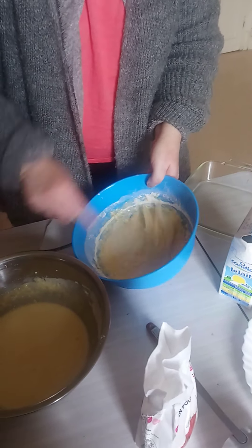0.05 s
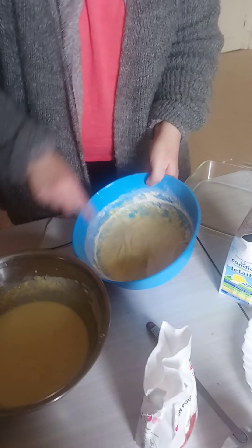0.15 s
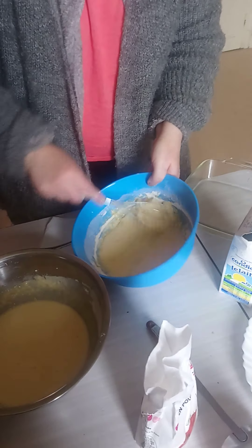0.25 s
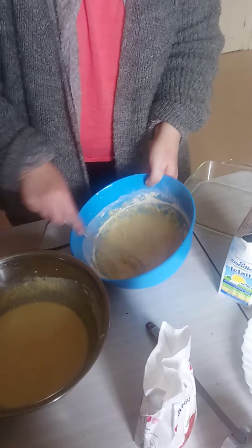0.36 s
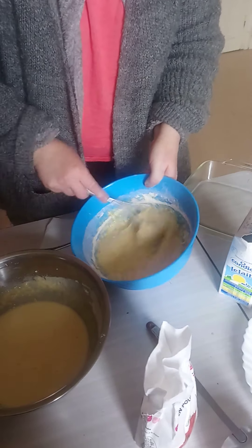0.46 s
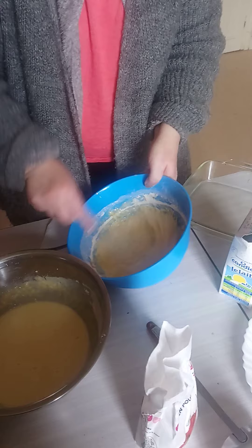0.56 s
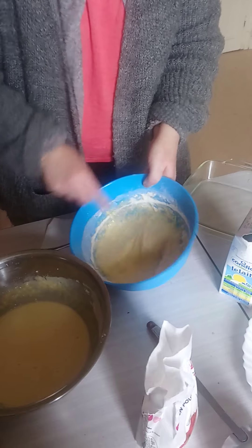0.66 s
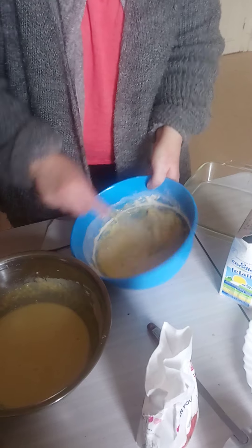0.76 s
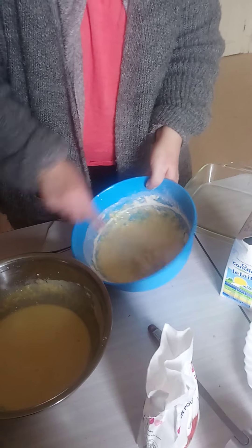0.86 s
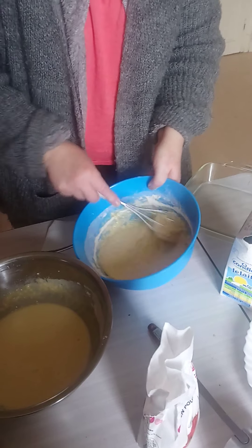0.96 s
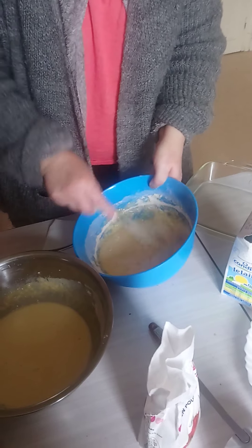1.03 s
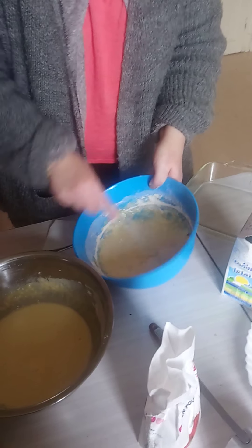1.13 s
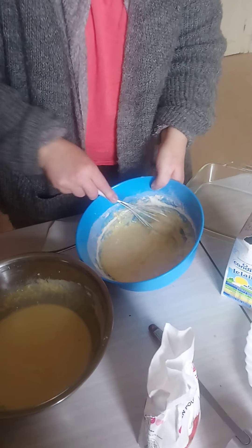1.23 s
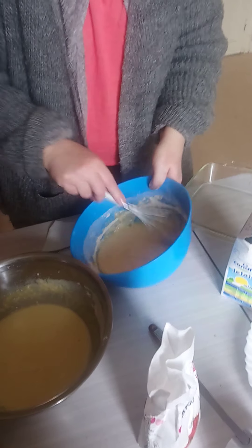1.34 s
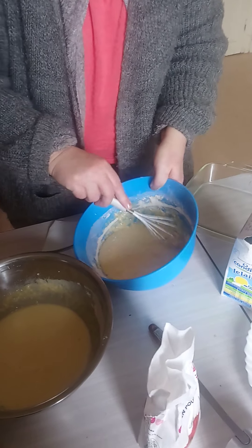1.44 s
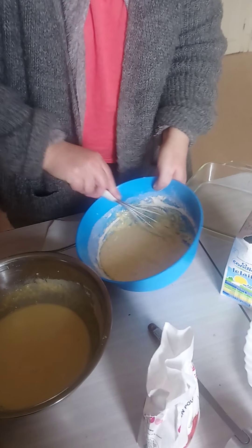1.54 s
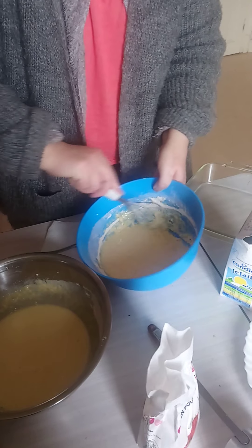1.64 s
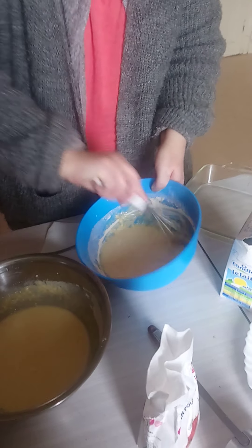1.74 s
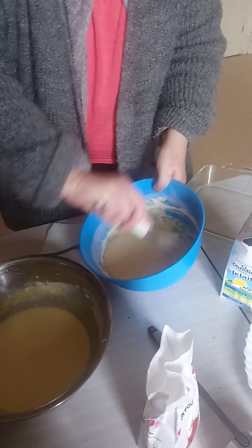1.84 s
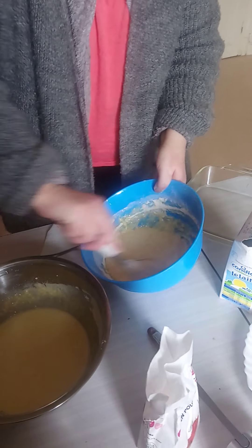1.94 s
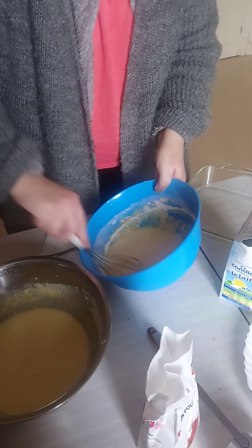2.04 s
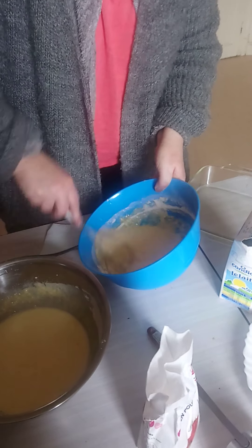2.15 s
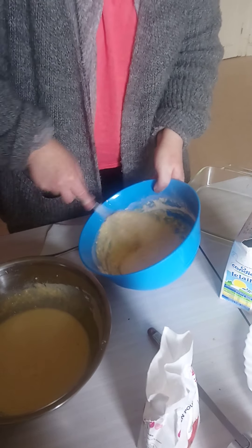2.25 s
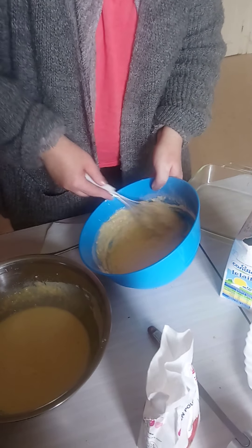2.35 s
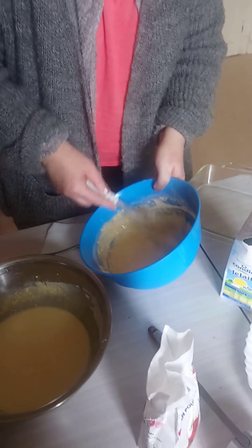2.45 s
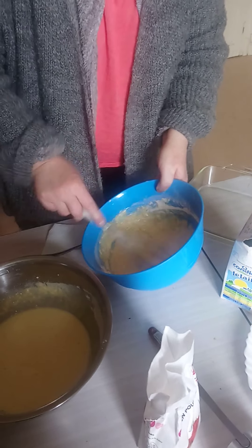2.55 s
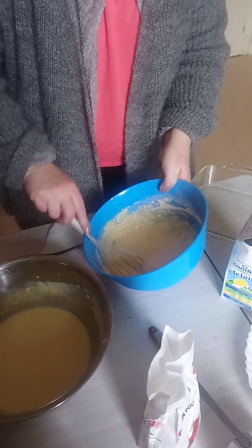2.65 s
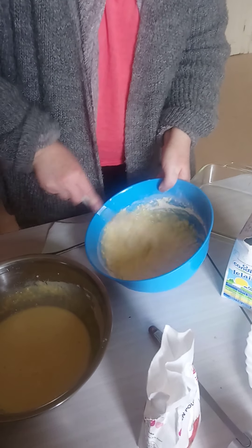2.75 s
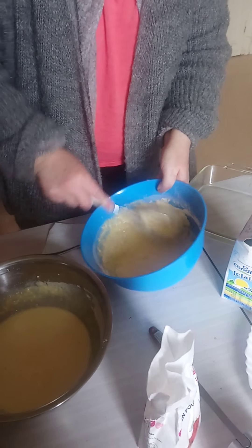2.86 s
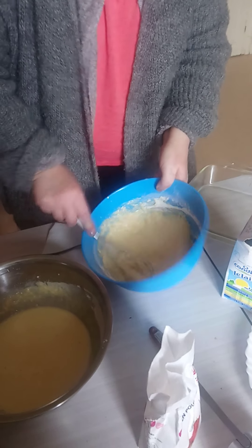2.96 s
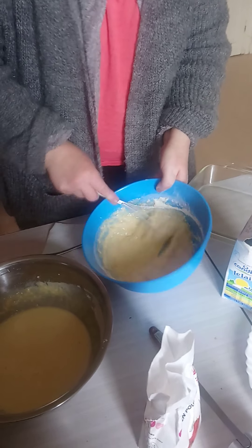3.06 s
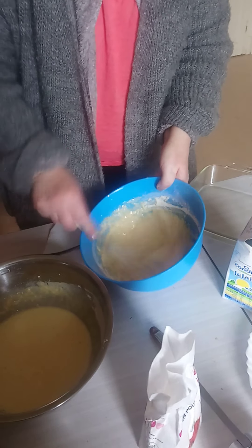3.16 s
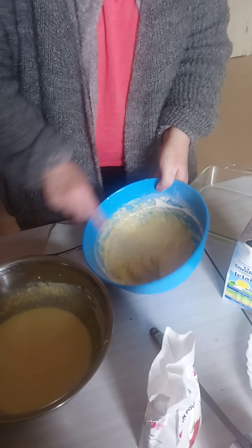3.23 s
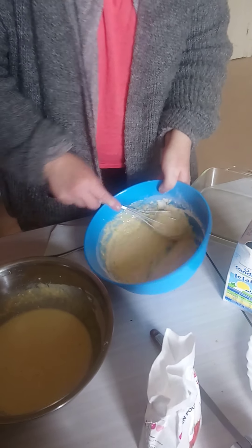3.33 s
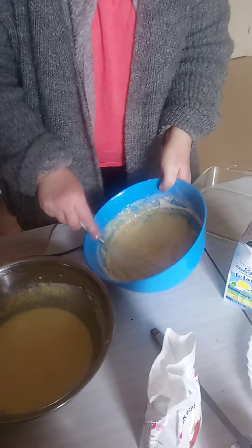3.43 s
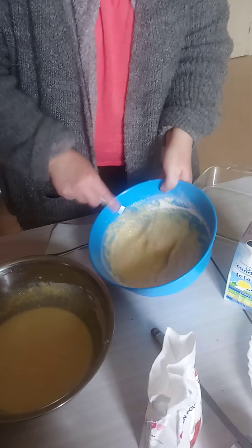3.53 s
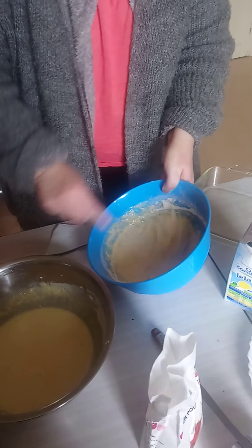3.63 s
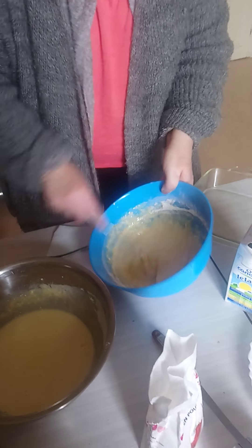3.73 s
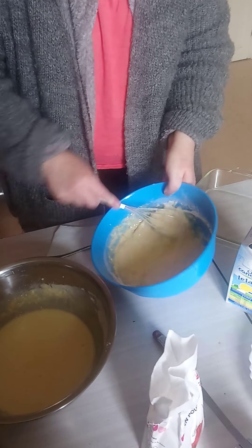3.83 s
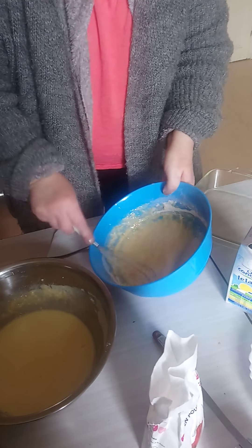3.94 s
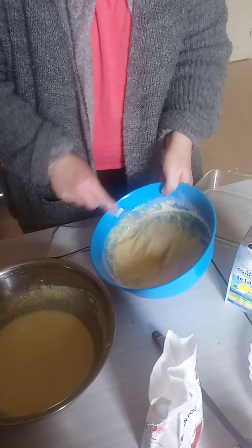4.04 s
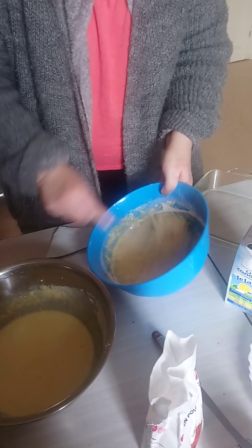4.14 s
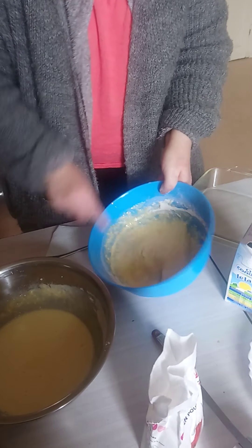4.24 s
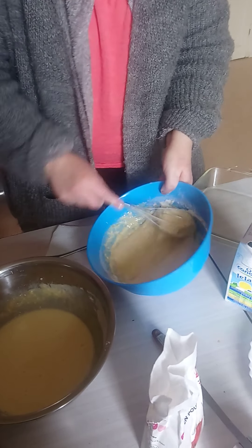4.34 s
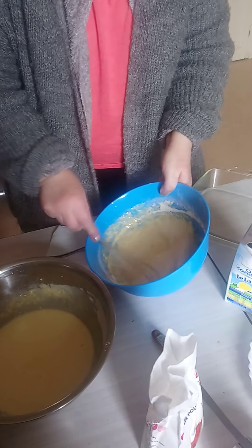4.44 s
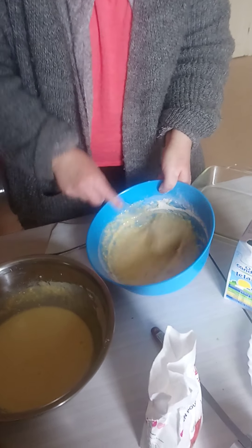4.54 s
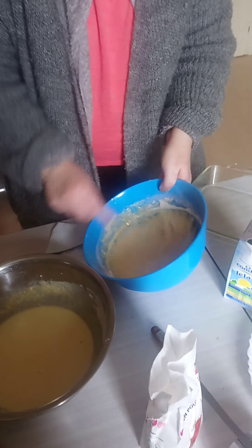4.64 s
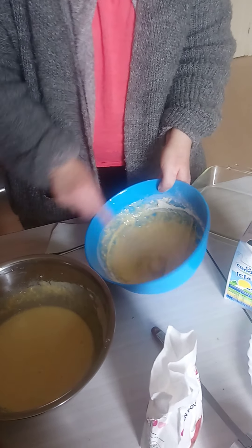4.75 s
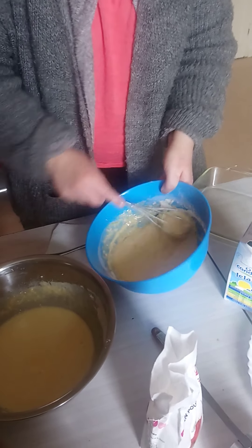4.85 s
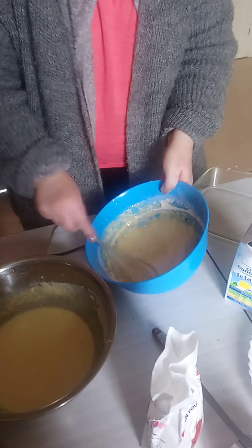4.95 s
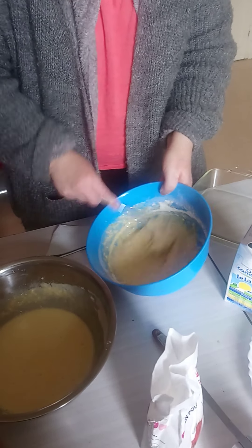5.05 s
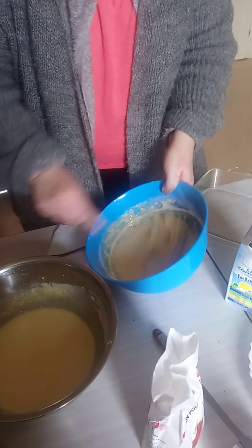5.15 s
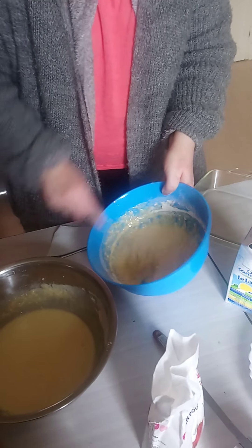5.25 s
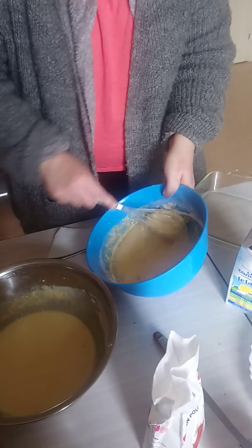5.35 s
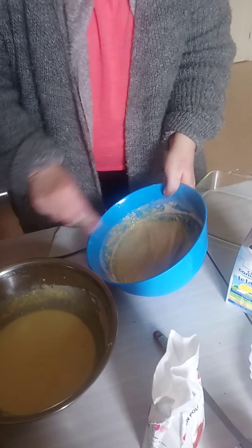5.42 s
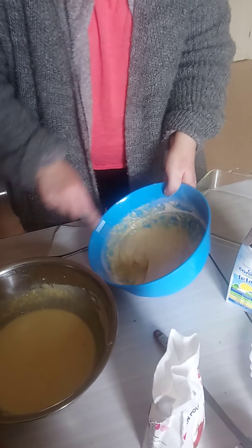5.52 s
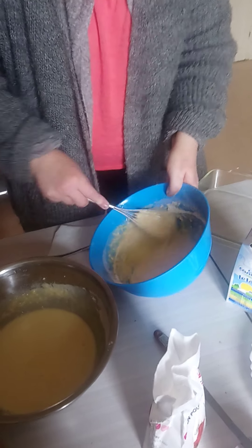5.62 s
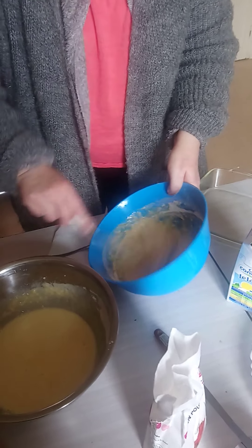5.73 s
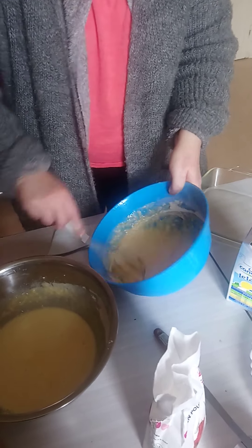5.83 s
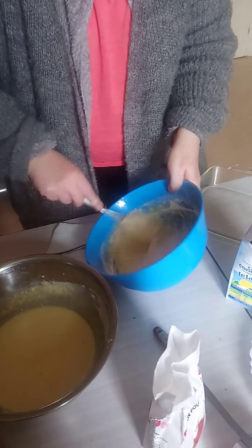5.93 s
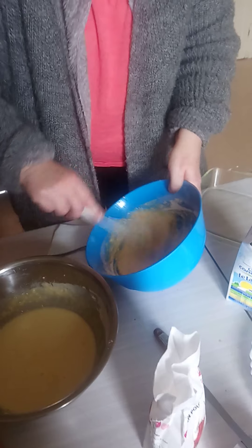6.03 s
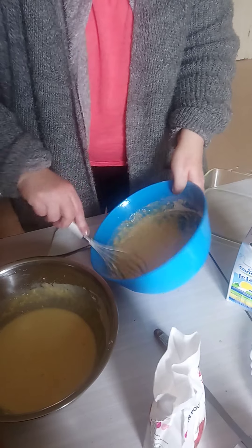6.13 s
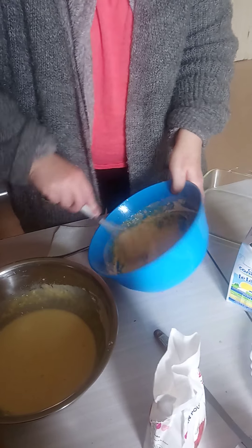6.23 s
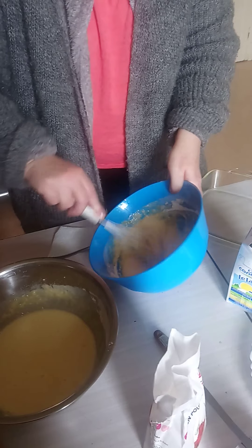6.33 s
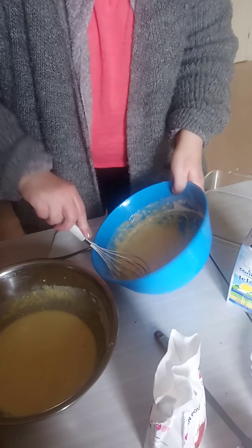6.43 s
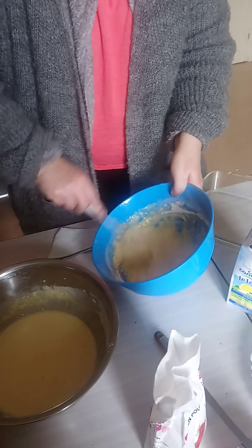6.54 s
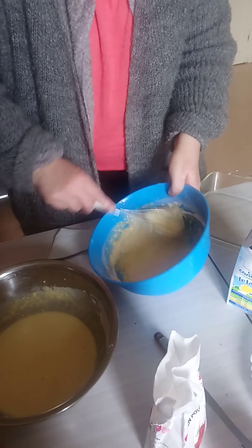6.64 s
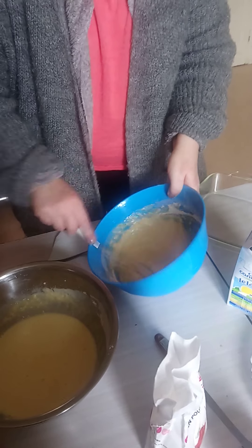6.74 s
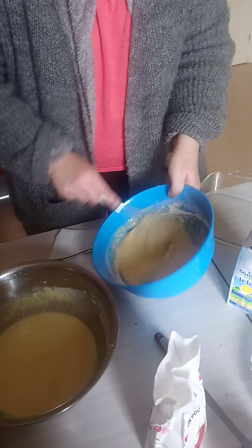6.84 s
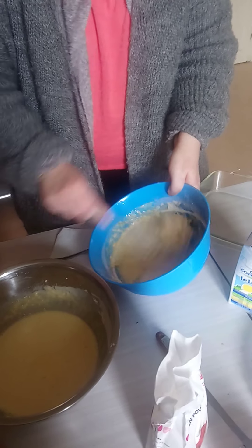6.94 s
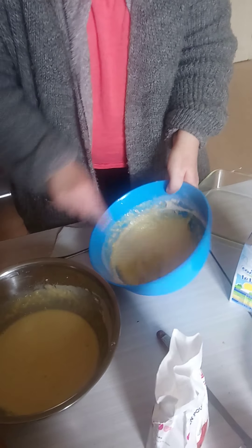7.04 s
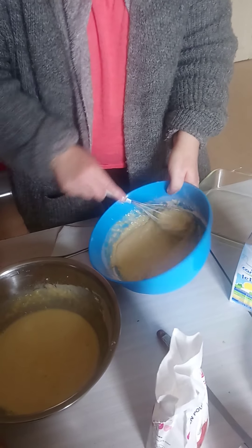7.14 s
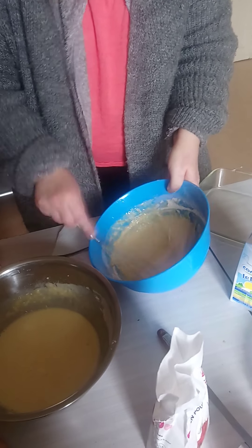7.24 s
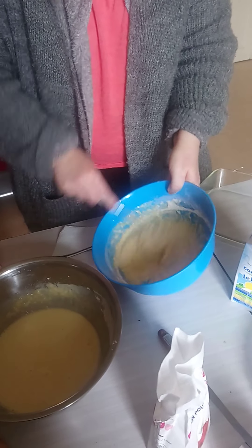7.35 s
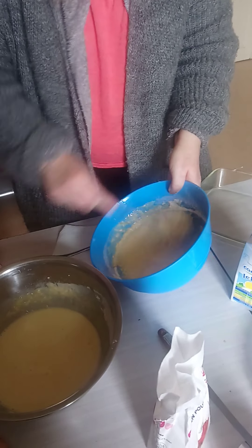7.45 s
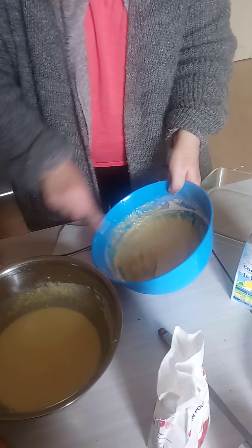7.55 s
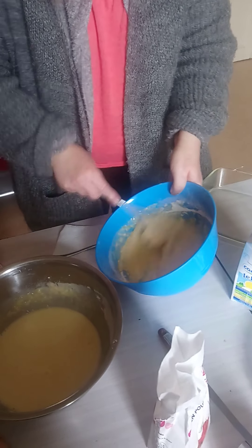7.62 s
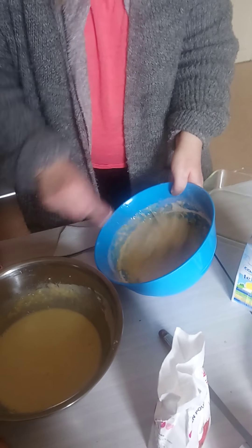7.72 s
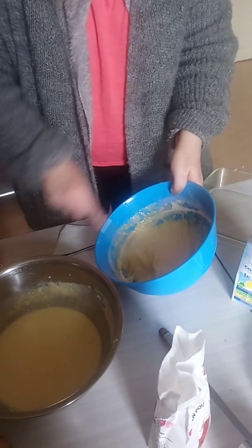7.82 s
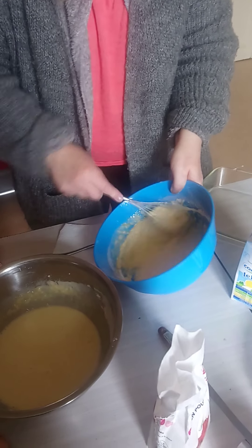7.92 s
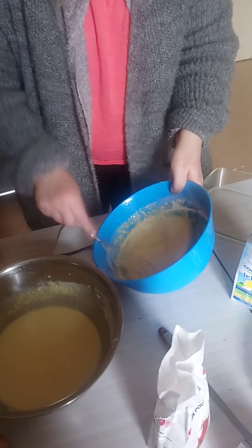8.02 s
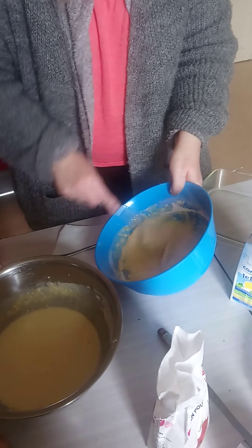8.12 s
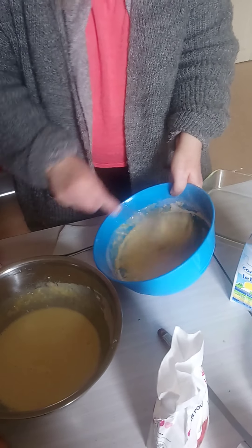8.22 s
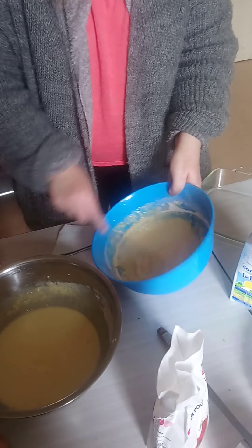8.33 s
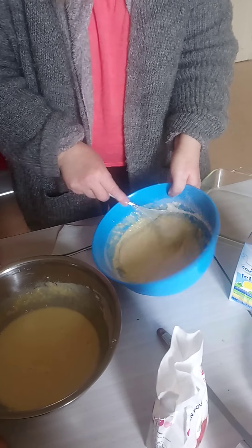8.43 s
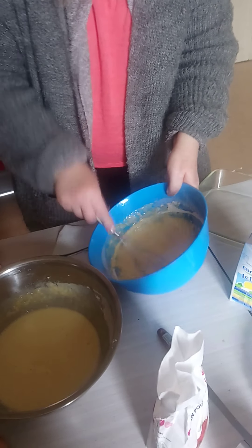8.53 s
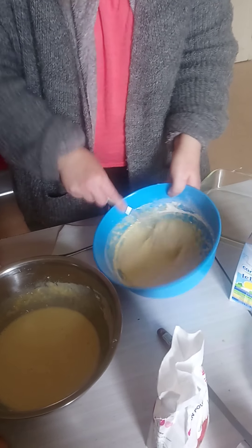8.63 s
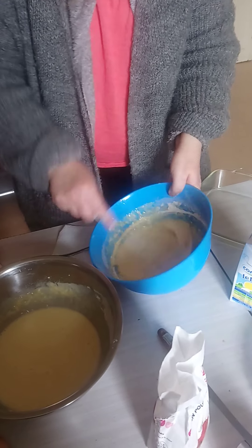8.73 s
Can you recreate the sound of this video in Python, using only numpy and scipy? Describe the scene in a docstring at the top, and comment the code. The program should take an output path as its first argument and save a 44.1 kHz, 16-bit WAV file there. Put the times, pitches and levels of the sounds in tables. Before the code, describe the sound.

A wire whisk beats thick batter in a plastic bowl, first in uneven strokes with a steel ring, then fast and steady.

```python
"""Whisk beating batter

A wire whisk beats batter in a tilted plastic bowl on a kitchen table, heard close up at two ports.
Wires strike the wall and table thumps ring (dying sines), batter slaps (rising tones with dull noise),
the drag hisses (shaped noise); one knock sets a steel bowl ringing, two light touches follow.
Hard kitchen walls carry each blow on for about a third of a second (decaying noise tails)."""
import sys
import numpy as np
from scipy import signal
from scipy.io import wavfile
from scipy.ndimage import uniform_filter1d

SR = 44100
rng = np.random.default_rng(int(sys.argv[2]) if len(sys.argv) > 2 else 0)


def wrap_up_sound(samples):
    """Save the sound to the file named by the first command line argument, as 16-bit audio."""
    columns = np.atleast_2d(samples).T
    # keep every value between -1 and 1, then stretch to whole-number steps
    tamed = np.clip(columns, -1, 1)
    steps = np.round(tamed * 32767).astype(np.int16)
    wavfile.write(sys.argv[1], SR, steps)


N = 387198


def amp(db):
    """Amplitude factor of a level in dB."""
    return 10 ** (np.asarray(db, float) / 20)


def evened(x):
    """Scale to an rms of 1."""
    return x / np.sqrt(np.mean(x ** 2) + 1e-20)


def read(points, hz):
    """Interpolate a (frequency, value) curve over log frequency."""
    f, value = np.transpose(points)
    return np.interp(np.log(hz + 1), np.log(f + 1), value)


def add(mix, start_s, sound):
    """Mix a sound in at start_s, cut at the end of the mix."""
    part = mix[round(start_s * SR):][:len(sound)]
    part += sound[:len(part)]


def ring(modes, seconds, extra_db=0, detune=1, lag_s=0):
    """Struck body: each mode is a sine that dies by 60 dB in its t60."""
    hz, db, t60_s = np.transpose(modes)[:, :, None]
    t = np.arange(round(seconds * SR)) / SR
    extra_db, detune, lag_s = (np.reshape(v, (-1, 1)) for v in (extra_db, detune, lag_s))
    envelope = amp(db + extra_db - 60 * t / t60_s)
    return (envelope * np.sin(2 * np.pi * hz * detune * np.maximum(t - lag_s, 0))).sum(0)


# left-right likeness of scattered sound: (frequency [Hz], correlation [0-1])
LIKENESS = [(60, .99), (180, .96), (550, .5), (1650, .13), (5000, 0)]


def scattered(shape):
    """Stereo noise with the dB field shape(hz, t): bass nearly alike in both ports, treble independent."""
    hz, t = np.fft.rfftfreq(512, 1 / SR)[:, None], np.arange(N // 128 + 5) * 128 / SR
    a, b, c, d = rng.standard_normal((len(t), 257, 4)).T
    same = read(LIKENESS, hz)
    left, other = a + 1j * b, c + 1j * d
    z = np.array([left, same * left + np.sqrt(1 - same ** 2) * other])
    return signal.istft(z * amp(shape(hz, t)), nperseg=512, noverlap=384)[1][:, :N]


# spectrum of the quiet kitchen after the microphones: (frequency [Hz], relative density [dB per Hz])
AIR = [(18, -63), (30, -17), (115, -5), (145, 2), (780, -27), (6210, -15), (12600, -36), (13700, -34),
       (16000, -70)]
AIR_RMS_DB = -64.5  # before the microphones


def quiet_air():
    """Steady room noise; the microphone curve is taken out here as record() puts it back."""
    noise = scattered(lambda hz, t: read(AIR, hz) - read(MIC, hz) + 0 * t)
    return amp(AIR_RMS_DB) * evened(noise)


# spectrum of the drag after the microphones: (frequency [Hz], relative density [dB per Hz])
HISS = [(35, -10), (60, -1.5), (113, -2.5), (651, 6.5), (862, 0.5), (1950, 5.5), (2840, 3), (4530, 6.5),
        (6900, 1), (7940, -16.5), (16000, -20.5)]
# wires sweep along the wall and through batter: (time of fastest motion [s], level [dB])
SWEEPS = [(0.0, -36), (.4, -32), (.65, -33), (.87, -40.5), (3.02, -34), (3.51, -33.5), (3.771, -31.5),
          (4.01, -31.5), (4.26, -37), (4.52, -34), (4.762, -36), (5.01, -35), (5.271, -26.5), (5.56, -38),
          (5.86, -44), (6.49, -35), (7.33, -33.5), (7.59, -47), (7.85, -34), (8.11, -38), (8.37, -31)]
SWELL_DB_PER_S, EBB_DB_PER_S, SWEEP_SLOSH_DB = 276, 182.5, 2
# slow stirring, whisk lifted at 2.4 s and set again: (time [s], level [dB], slosh against hiss [dB])
STIR = [(0.0, -58, 8), (1.25, -48, 9.5), (1.33, -64.5, 19), (1.77, -43.5, 2), (1.97, -44.5, -3),
        (2.2, -51.5, -3), (2.3, -47.5, -4), (2.34, -50.5, -4), (2.42, -64.5, 7.5), (2.58, -62.5, 6),
        (2.62, -47, -7), (2.7, -50, 5), (2.74, -39.5, -2.5), (2.82, -48.5, -1), (2.9, -65, 14),
        (3.0, -57.5, .1), (8.78, -54.5, 11)]
SLOSH_TOP_HZ = 1200


def drag():
    """Wet grainy hiss in drifting patches that swells and ebbs each sweep; slosh lifts the low part."""
    stir_s, stir_db, slosh_db = np.transpose(STIR)
    fastest_s, sweep_db = np.transpose(SWEEPS)[:, :, None]

    def field(hz, t):
        swing_db = np.minimum(SWELL_DB_PER_S * (t - fastest_s), EBB_DB_PER_S * (fastest_s - t))
        sweep = amp(sweep_db + swing_db).sum(0)
        low = 1 / (1 + (hz / SLOSH_TOP_HZ) ** 4)
        stir = amp(np.interp(t, stir_s, stir_db) + np.interp(t, stir_s, slosh_db) * low)
        gain = sweep * amp(SWEEP_SLOSH_DB * low) + stir
        return colour + 3.0 * patches + 20 * np.log10(gain)

    patches = rng.standard_normal((N // 128 + 5, 257)).T
    patches = evened(uniform_filter1d(uniform_filter1d(patches, 8, 0), 8, 1))
    bins = np.fft.rfftfreq(512, 1 / SR)[:, None]
    colour = read(HISS, bins) - read(MIC, bins)
    loudness = np.std(scattered(lambda hz, t: colour + 0 * t))
    bumps = evened(uniform_filter1d(rng.exponential(1, N) ** 2 - 2, 60))
    grain = amp(0.76 * bumps.clip(-3, 4))  # dB per unit of bump
    return scattered(field) / loudness * evened(grain)


# wires on the plastic wall: (time [s], highest 4 ms rms [dB], mid wall [dB], top of wall [dB])
STRIKES = [(.0762, -33, -19, -6), (.1158, -29, 24, -2), (.164, -29, 12.5, -5), (.1893, -37, -20, -3),
           (0.197, -39, -16, 8), (.322, -39, -10, 9), (.3335, -26.5, -4, -5.5), (0.56, -42, -7, 6),
           (.5638, -32.5, 6, -4.5), (0.588, -34.5, -13, 7), (.679, -35.5, -4, 15),
           (.7868, -29.5, -10, -7.5), (.8966, -30, 2, 3.5), (1.045, -39.5, -21, 1), (1.1341, -36, 6, 1.5),
           (1.1507, -34, -8, -2.5), (1.3113, -24.5, -7, -14), (1.4491, -33.5, -12, 1.5),
           (1.596, -46.5, -23, -4), (1.686, -48, -30, 0), (1.72, -44, -25, 13), (1.7544, -40, -32, -5),
           (2.916, -32, -3, 0), (2.9208, -21, -4.5, -5.5), (2.9738, -30, 15, -4), (3.0397, -36, -12, 12),
           (3.048, -35, -16, -2), (3.146, -26, 1, -20), (3.151, -20.5, -27, -4.5), (3.2033, -35, -1, -8),
           (3.254, -27.5, 20, 1), (3.415, -33.5, -16, -2), (3.4204, -28, 0.5, -7), (3.5044, -29, 24.5, 7),
           (3.658, -34, -9, 5), (3.662, -20, -13, -3), (3.9223, -16, -13, -3.5), (4.171, -38, -5, 5),
           (4.1776, -25.5, -2.5, -5.5), (4.2363, -27, 15.5, 1.5), (4.2629, -30.5, 4, 0),
           (4.417, -46, -5, 6), (4.4228, -27.5, 8.5, -2), (4.4528, -25.5, 10, 4), (4.667, -37, -5, 6),
           (4.6708, -23, 2.5, -6), (4.807, -43, -20, 14), (4.922, -34, -9, 3), (4.9261, -22, 1.5, -6.5),
           (5.052, -33, -15, 7), (5.171, -16, -27, -3), (5.444, -18, -13, -3.5), (5.7404, -16, -3.5, -2),
           (6.0731, -16.5, -17, -2.5), (6.097, -30, 7, -7), (6.3807, -18.5, -3, -2),
           (6.7056, -25.5, -1, -7), (6.7718, -22, 8.5, -1), (6.969, -16.5, -35, -4.5),
           (7.0576, -26, 10.5, -1), (7.2369, -17.5, -7, -1.5), (7.4981, -17, -14, -1.5),
           (7.506, -24.5, -17, -8), (7.5691, -24.5, 1.5, -7), (7.6597, -52, 1, 5),
           (7.7554, -15.5, -7, -3.5), (7.7894, -28, 10, -3), (8.0164, -16.5, -5, -0.5),
           (8.0571, -23, 18, -22), (8.283, -42, -7, 5), (8.2884, -21, 0.5, -3), (8.519, -40, -5, 8),
           (8.5263, -23, 0.5, -1), (8.6002, -35.5, 11, 4), (8.753, -32, -5, 3), (8.7628, -22.5, -5, -5.5)]
# modes of the plastic wall: (frequency [Hz], level [dB], t60 [s])
WALL = [(265, 0, .03), (350, 0, .025), (620, 0, .018), (790, 0, .018), (1200, 0, .015), (1670, -1, .012),
        (1890, 2, .012), (2290, -1, .011), (2600, -2, .009), (2930, -1, .011), (3300, -2, .008),
        (3700, -2, .008), (4240, -2, .007), (4800, -2, .007), (5200, -3, .006), (5650, -1, .007),
        (6300, -2, .007), (6900, -3, .006)]
# straight path of a blow: (frequency [Hz], left over right port [dB])
SHADOW = [(900, 1.5), (1900, 1), (3200, 4), (5700, 8.5)]
LEFT_LAG_S = 4 / 44100
LOW_WALL_DB, TICK_DB = -4, 8.5  # low wall against its middle; bare steel tick against top of wall
CONTACTS, LANDING_CONTACTS, LAND_S = 18, 5, .005
RATTLE_START_S, RATTLE_S, RATTLE_DB, RATTLE_FADE_DB_PER_S = .007, .13, -11.5, -88
LEAD_S, LEAD_DB = .006, -52  # the foremost wire touches lightly ahead, however hard the blow


def strikes():
    """Wires land within a few ms, then rattle; each of four loops meets another spot of the wall,
    and each wall mode reaches the two ports by its own path."""
    out, hz = np.zeros((2, N)), np.transpose(WALL)[0]
    contact = np.arange(CONTACTS)
    landing = contact < LANDING_CONTACTS
    for s, db, mid_db, top_db in STRIKES:
        when, size, sign = rng.random((3, 4, CONTACTS))  # four loops of wire
        fade_db = RATTLE_DB * ~landing
        when = np.where(landing, LAND_S * when ** 1.2, RATTLE_START_S + RATTLE_S * when ** 1.4)
        size = np.where(landing, 0.19 + size ** 2, .06 + size ** 5) * np.sign(sign - .5)
        size = size * amp(RATTLE_FADE_DB_PER_S * when + fade_db)
        when = when + LEAD_S * (contact > 0)
        size[:, 0] *= amp(min(LEAD_DB - db, 0))
        colour_points = [(300, LOW_WALL_DB), (900, mid_db), (1800, 0), (4500, 0.014), (6200, top_db)]
        colour = read(colour_points, hz)
        blow, path = np.zeros((2, 9000)), rng.random(len(WALL))
        for loop_when, loop_size in zip(when, size):
            spot, crack = rng.standard_normal((2, len(WALL))), rng.standard_normal((2, 7000))
            wires = np.zeros(7000)
            np.add.at(wires, (np.clip(loop_when, 0, .15) * SR).astype(int), loop_size)
            tick_envelope = np.convolve(abs(wires), np.exp(-np.arange(300) / 65.0))[:7000]
            tick = np.diff(crack, prepend=0) * tick_envelope
            for port, side in enumerate((.5, -.5)):
                mode_db = colour + 2.5 * spot[0] + side * read(SHADOW, hz)
                lag_s = 2 * LEFT_LAG_S * path * (1 - port)
                wall = ring(WALL, .04, mode_db, 1 + .08 * spot[1], lag_s)
                add(blow[port], 0, signal.oaconvolve(wires, wall))
                add(blow[port], 0, amp(top_db + TICK_DB) * tick[port])
        blow *= amp(db) / np.sqrt(uniform_filter1d((blow ** 2).mean(0), 180).max())
        for port in (0, 1):
            add(out[port], max(s - .001 - LEAD_S, 0), blow[port])
    return out


# the bowl rocks on the table: (time [s], peak level [dB], modes above 200 Hz [dB])
THUMPS = [(.074, -28, 17), (0.145, -23.5, -5), (.169, -39, 21), (.33, -29, -15), (0.397, -19.5, -3),
          (0.569, -27.5, 3), (.786, -32.5, -2), (0.857, -30.5, -8), (1.042, -41, 12), (1.136, -35, -6),
          (1.31, -11.5, 9.5), (1.332, -19, 19), (1.349, -30.5, 0), (1.755, -36.5, -8), (1.899, -43.5, 3),
          (2.607, -49, 14), (2.771, -45, 6), (2.916, -23, 5), (2.937, -8.5, 11), (2.974, -17.5, 5),
          (3.145, -36, 1), (3.25, -23, -4), (3.414, -30, 9), (3.487, -23, -8), (3.661, -27.5, -4),
          (3.92, -28.5, 10), (4.169, -30, -8), (4.232, -22.5, 3), (4.42, -34, 0), (4.508, -26, 3),
          (4.667, -30, 17), (4.76, -28.5, 5), (4.92, -24.5, 23), (5.002, -21.5, -4), (5.169, -60, -2),
          (5.245, -24.5, 0), (5.441, -40, -10), (5.512, -27.5, -11), (5.819, -48, -3), (6.097, -31.5, -5),
          (6.226, -26.5, 1), (6.297, -26, -5), (6.374, -30, -4), (6.478, -32, -5), (6.708, -26, 12),
          (6.739, -24, 8), (6.773, -16, -9), (6.968, -30, 6), (7.026, -24.5, -13), (7.059, -27, -6),
          (7.237, -27, 8), (7.321, -26.5, -3), (7.545, -20, -6), (7.75, -39, -23), (7.799, -35, -2),
          (8.012, -22.5, 38), (8.054, -11.5, -5.5), (8.29, -25, -9), (8.346, -28.5, -12), (8.53, -23, -2),
          (8.601, -30, -4), (8.754, -20, -4)]
# modes of the table: (frequency [Hz], level [dB], t60 [s])
TABLE = [(124, 8, 0.2), (172, -8, 0.12), (217, -4, 0.09), (275.3, 5, 0.07), (363.6, -1, 0.08)]


def thumps():
    """A soft push into the table top: its modes ring, blunted by a 70-sample contact."""
    out, hz = np.zeros(N), np.transpose(TABLE)[0]
    for s, db, upper_db in THUMPS:
        spot = rng.standard_normal((2, len(TABLE)))
        knock = ring(TABLE, .3, upper_db * (hz > 200) + 2.5 * spot[0], 1 + 0.03 * spot[1])
        knock = np.convolve(knock, np.hanning(70))
        add(out, s, amp(db) * knock / abs(knock).max())
    return out


# batter slaps shut behind the wires: (time [s], level before the fade envelope [dB], cavity [Hz])
SLAPS = [(.075, -18.5, 660), (.115, -30, 580), (.144, -21.5, 813), (.334, -19.5, 716), (.392, -19, 720),
         (.412, -16, 730), (.564, -25, 1180), (.604, -27.5, 810), (.787, -27, 1120), (.853, -25, 743),
         (1.309, -33.5, 930), (2.617, -42, 603), (2.921, -18, 720), (3.15, -19, 734), (3.204, -14, 735),
         (3.416, -21, 740), (3.486, -17.5, 720), (3.662, -16.5, 755), (3.921, -29, 570), (3.95, -17, 600),
         (4.176, -23.5, 764), (4.241, -16, 800), (4.422, -31, 776), (4.454, -19, 800), (4.503, -21.5, 744),
         (4.51, -17, 664), (4.672, -19, 740), (4.762, -17, 740), (4.926, -18.5, 713), (4.997, -13.5, 747),
         (5.17, -17.5, 730), (5.268, -25, 627), (5.328, -30, 1170), (5.443, -21, 783), (5.74, -18, 744),
         (6.097, -16.5, 656), (6.378, -20, 840), (6.704, -23, 824), (6.77, -20, 990), (6.968, -11.5, 756),
         (7.057, -39, 570), (7.277, -24.5, 795), (7.496, -25, 833), (7.53, -22, 840), (7.567, -31, 966),
         (7.752, -19, 780), (7.788, -19, 613), (8.014, -19, 814), (8.057, -11.5, 788), (8.288, -19.5, 770),
         (8.527, -21, 846), (8.6, -17.5, 740), (8.762, -19.5, 804)]
SLAP_RISE_S, SLAP_FADE_S, SLAP_SPLASH_DB = 0.0017, 0.0035, -11
SLAP_GLIDE_PER_S = 9  # in the phase; the pitch climbs at twice this


def slaps():
    """A pocket of air closes: a few cycles that rise in pitch, under a dull splash."""
    out, t = np.zeros(N), np.arange(2000) / SR
    fade = (1 - np.exp(-t / SLAP_RISE_S)) * np.exp(-t / SLAP_FADE_S)
    for s, db, hz in SLAPS:
        dull_noise = np.convolve(rng.standard_normal(len(t)), np.hanning(24), "same")
        splash = amp(SLAP_SPLASH_DB) * evened(dull_noise)
        cavity = np.sin(2 * np.pi * hz * t * (1 + SLAP_GLIDE_PER_S * (t - SLAP_FADE_S)))
        add(out, s, amp(db) * fade * (cavity + splash))
    return out


# decay of the kitchen: (frequency [Hz], t60 [s])
KITCHEN = [(100, 0.38), (260, 0.41), (700, 0.37), (1840, 0.41), (4850, 0.31), (12800, 0.24)]


def kitchen(x):
    """Three noise tails that decay band by band, fed in turn so that like blows differ."""
    hz, t = np.fft.rfftfreq(256, 1 / SR)[:, None], np.arange(500) * 64 / SR
    same, out = read(LIKENESS, hz), np.zeros((2, N))
    for k in range(3):
        taps = rng.choice([-1., 1.], (2, 499 * 64)) * (rng.random((2, 499 * 64)) < .08)
        taps[:, :150] = 0  # the first echo arrives 3.4 ms after the blow
        z = signal.stft(taps, nperseg=256, noverlap=192)[2]
        z[1] = same * z[0] + np.sqrt(1 - same ** 2) * z[1]
        tail = signal.istft(z * amp(-60 * t / read(KITCHEN, hz)), nperseg=256, noverlap=192)[1]
        tail = tail / np.linalg.norm(tail[0])
        turn = np.sqrt(2 / 3) * np.cos(np.pi * (1.3 * np.arange(N) / SR + k / 3))
        out += signal.oaconvolve((x * turn)[None], tail, axes=1)[:, :N]
    return out


# the steel bowl is jolted: (time [s], level [dB], share of free ring time [0-1])
KNOCKS = [(1.31, -43, 1), (1.698, -45.5, 0.074), (1.754, -40.5, 0.082)]
# modes of the steel bowl: (frequency [Hz], level [dB], free t60 [s])
STEEL = [(1453, -12, .45), (1648, 0, .6), (1671, -2, .6), (1938, -10, .4), (2250, -10, .35),
         (2439, -12, .6), (2805, -12, .45), (3133, -16, .7), (3537, -13, .5), (4280, -14, .5),
         (1130, -12, .8), (640, -12, .6)]


def steel():
    """Close pairs of modes beat as the bowl rings out; light touches are soon damped."""
    out = np.zeros(N)
    for s, db, share in KNOCKS:
        add(out, s, amp(db) * ring(np.multiply(STEEL, [1, 1, share]), 1.2))
    return out


WIRES_ROOM_DB, BATTER_ROOM_DB, STEEL_ROOM_DB, TABLE_ROOM_DB = -0.5, -3.5, -7, -1.5


def scene():
    """Sum direct sounds, their kitchen tails, drag and air."""
    wires, table, batter, bowl = strikes(), thumps(), slaps(), steel()
    near = batter + bowl
    late = np.roll(near, round(LEFT_LAG_S * SR))  # both sound nearer the right port
    to_room = amp(WIRES_ROOM_DB) * wires[1] + amp(BATTER_ROOM_DB) * batter
    to_room = to_room + amp(STEEL_ROOM_DB) * bowl + amp(TABLE_ROOM_DB) * table
    return quiet_air() + drag() + wires + table + np.array([late, near]) + kitchen(to_room)


# response of the microphones: (frequency [Hz], mean of both ports [dB])
MIC = [(40, -25), (70, -33), (110, -9.5), (5000, 6), (6900, 1.5), (8200, -16), (10000, -21.5), (13500, -28),
       (15300, -11.5), (16200, -37.5)]
# difference of the ports: (frequency [Hz], left over right [dB])
PORTS = [(120, 1), (240, 2.5), (950, 1.5), (3000, 0), (5500, -6), (8000, -16), (15000, -12)]
EDGE_HZ = 16600


def record(dry):
    """Each port has its own frequency response; then the band limit."""
    hz = np.linspace(0, SR / 2, 2049)
    responses = [amp(read(MIC, hz) + side * read(PORTS, hz) / 2) for side in (1, -1)]
    taps = np.array([signal.firwin2(1001, hz, response, fs=SR) for response in responses])
    heard = signal.oaconvolve(dry, taps, "same", axes=1)
    band_limit = signal.firwin(511, EDGE_HZ, window=("kaiser", 9), fs=SR)
    return signal.oaconvolve(heard, band_limit[None], "same")


dry = scene()
out = record(dry)
wrap_up_sound(out)
```